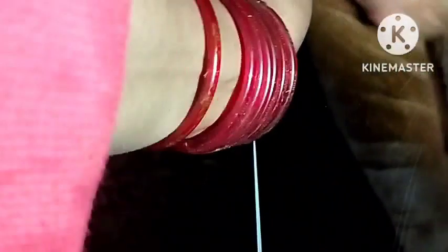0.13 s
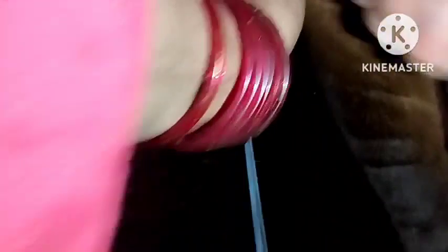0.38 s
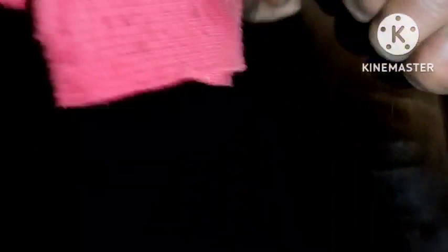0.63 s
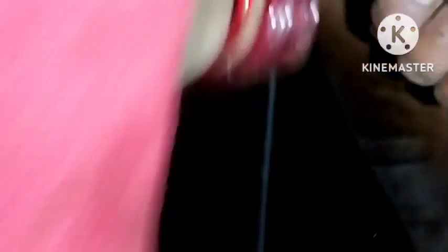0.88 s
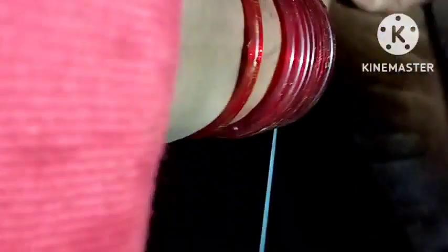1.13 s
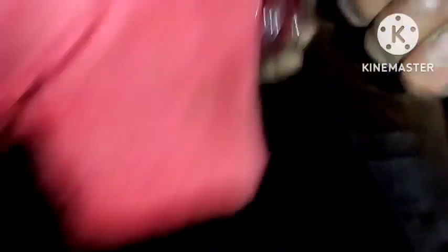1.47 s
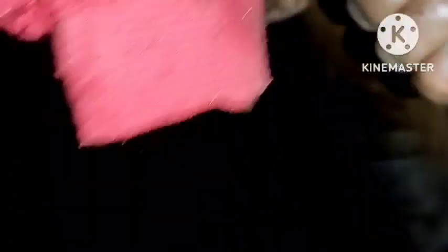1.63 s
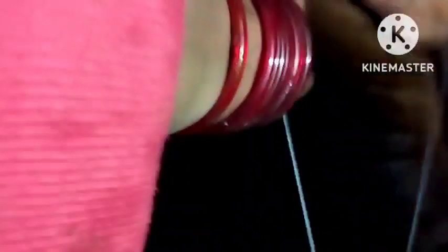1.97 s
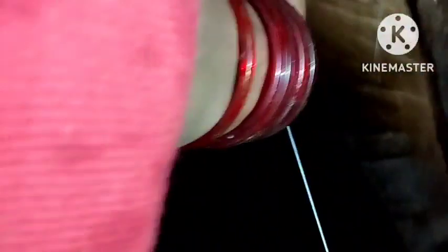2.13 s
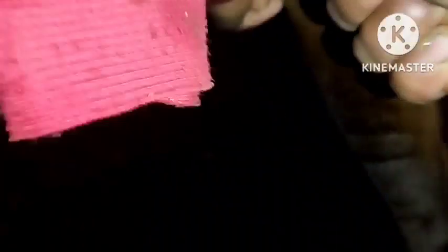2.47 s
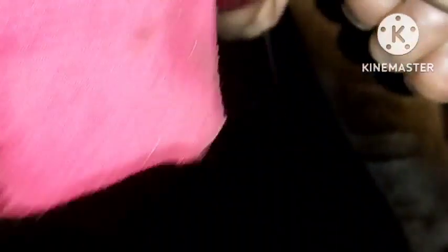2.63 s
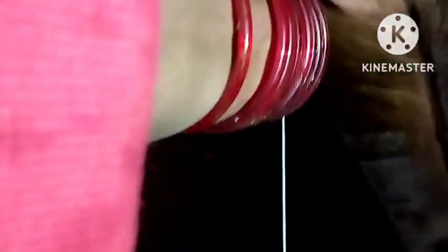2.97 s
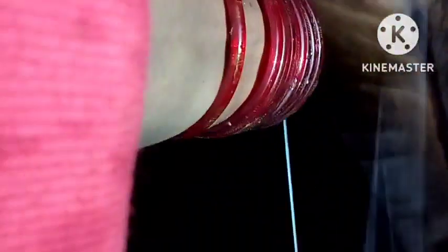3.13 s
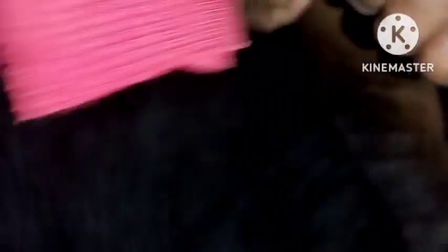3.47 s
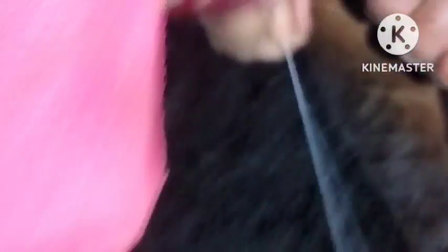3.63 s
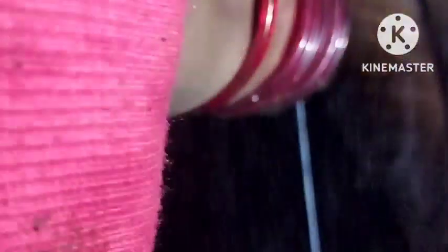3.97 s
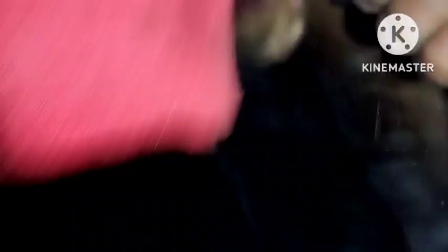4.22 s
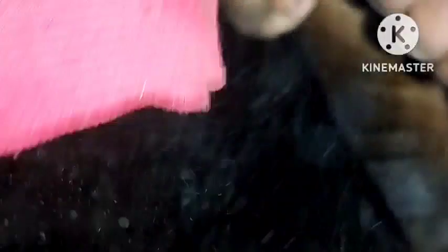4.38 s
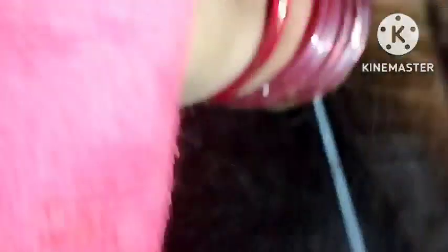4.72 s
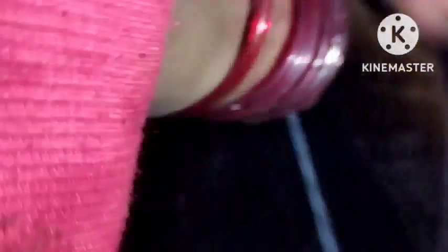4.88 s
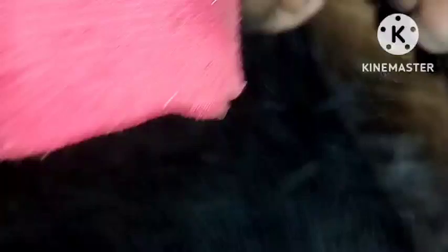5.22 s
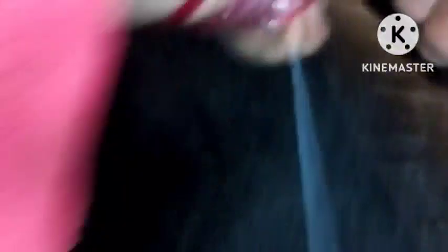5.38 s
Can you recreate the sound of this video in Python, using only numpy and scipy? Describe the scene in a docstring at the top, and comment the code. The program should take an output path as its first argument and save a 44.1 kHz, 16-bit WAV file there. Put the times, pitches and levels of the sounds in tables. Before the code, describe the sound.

Rhythmic jets of milk squirt into a frothy metal pail, each a hollow, gurgling splash with fizzing foam, close up in a quiet shed.

```python
"""Jets of milk from a hand-milked cow plunge into a frothy metal pail, close by, in a quiet shed.
Noisy bubble trains ring the air modes of the pail; decaying sines make the gulps of big air pockets.
Shaped noise makes froth, spray, slaps, hisses along the wall, low bumps on the right and still air.
Stray drops tick on the left, a bangle rings faintly at first, and late jets ring holes in the milk."""
import sys
import numpy as np
from scipy import signal
from scipy.fft import rfft, irfft, next_fast_len
from scipy.io import wavfile
from scipy.ndimage import uniform_filter1d, map_coordinates

SR = 44100
rng = np.random.default_rng(int(sys.argv[2]) if len(sys.argv) > 2 else 0)


def materialize(psi):
    """Save the field psi as 16-bit PCM at rate SR to the path in sys.argv[1].

    A 1-D psi becomes a single channel; in a 2-D psi each row is a channel.
    """
    bounded = np.clip(np.atleast_2d(psi).T, -1, 1)
    quanta = np.round(bounded * 32767).astype(np.int16)
    wavfile.write(sys.argv[1], SR, quanta)


N = 245637
TIME_S = np.arange(N) / SR
EDGE_HZ = 15700
ONSET_S, FADE_BEND = 0.0071, 1.16  # a jet fades slowly at first, then breaks off
SETTLING_DB = -57  # faint fizz of the foam between jets

# air modes of the pail: (frequency [Hz], width [Hz], relative level [dB], change per unit of aim [dB],
# left-right balance [dB], phase between the ears [rad])
DEEP_MODES = [(230, 38, -5, -1.5, -1.5, 0), (278, 36, -1, -2.5, -1, 0), (314, 24, 1, 2.5, -1, 0)]
DEPTH_MODES = [(608, 36, -10.5, -9.5, -5, 0.18), (691, 69, -11, 24, -2, 0),
               (763.4, 58, 2.5, -9.5, -1.5, 0.0091), (825, 150, -2, 4, -0.5, 0.32),
               (939, 61, 1.5, -8, -1, 0.52), (1049.6, 25, -8.5, -7, -16.5, 0.25)]
CROSS_MODES = [(1278, 140, 4, 6.5, 9.5, -2.5), (1402, 110, 3, -7, 0, -3),
               (1724.5, 155, -0.5, 22.5, -1, -1.5), (1885, 190, 10, 2, -2, -2.5),
               (2203, 126, -9, -7.5, 7, -0.5), (2748, 250, -3.5, 6.5, -25, -0.05)]
FIZZ_MODES = [(3080, 220, -1.1, 1, -2, 1), (3320, 320, 1, 0.66, -1, 1.3)]
# broad spectra: (frequency [Hz], relative density [dB per Hz])
CHURN_COLOUR = [(170, -18), (235, -1), (330, 0), (420, -10), (700, -40)]
PLUNGE_COLOUR = [(400, -73), (530, -16), (700, 2), (960, -0.5), (1150, 0), (1600, -51.5)]
SPLASH_COLOUR = [(750, -22), (1050, -4.5), (1400, 6.5), (1570, -2), (2000, 1.5), (2450, -4.5), (2850, -15),
                 (3500, -20.5), (5000, -59)]
FIZZ_COLOUR = [(2000, -25), (3000, -6.5), (3700, 1), (4500, -3.5), (5600, -5), (7000, -12.5), (8200, -27),
               (10000, -23)]
SPRAY_COLOUR = [(3000, -30), (5000, -11), (7000, -5.5), (8300, -14), (9500, -1), (11200, -4), (13000, 3.5),
                (15500, 0), (16500, -40)]
SHED_COLOUR = [(12, -33), (20, 1.5), (123, -13), (234, -35), (422, -11.5), (590, -23), (2600, -23),
               (13200, -50.5), (16000, -42)]
RUMBLE_COLOUR = [(20, 7.5), (50, -31), (120, 5.0), (200, 7.5), (400, -51)]
GRAZE_COLOUR = [(700, -13), (2000, 2), (3500, -4.5), (6200, 1.0), (8300, -11), (11000, -8.0)]
TICK_COLOUR = [(1000, -25), (4000, -14), (8200, -23), (9600, -8), (13000, 0), (15500, -2)]
BUMP_COLOUR = [(25, -29), (60, -3.5), (150, -2), (260, -11.5), (600, -40)]
# likeness of the ears: (frequency [Hz], correlation [-1 to 1])
EAR_LIKENESS = [(60, -0.11), (130, 0.94), (280, 0.94), (900, 0.78), (1200, 0.12), (3000, 0.05),
                (6000, -0.16)]
# where the jets land: (time [s], place [about -1 open milk, 1 close to the wall])
AIM = [(0, 0.27), (0.9, -1.42), (2.68, -0.21), (2.88, 0.72), (3.55, 0.19), (3.9, 0.42), (4.07, 0.76),
       (4.62, 0.37), (4.69, 0.99), (4.82, 0.984), (5.06, -0.35), (5.3, -0.53), (5.38, 0.61), (5.47, 0.6),
       (5.54, -0.26)]
# one jet or weak trickle of milk each: (start [s], flow [s], time to fade 20 dB [s], gurgle lasts on [s],
# swell over the flow [dB], then levels of churn, plunge, splash, fizz, spray [dB])
SQUIRTS = [(-0.25, 0.31, 0.14, 0, -0.5, -21.5, -20, -18, -23, -35.5),
           (0.13, 0.057, 0.4, 0.0, 0, -33, -32, -30.5, -36.5, -53),
           (0.228, 0.038, 0.44, 0.047, -3.5, -22.5, -33, -34, -42, -62),
           (0.676, 0.39, 0.21, 0.15, 11.5, -23.5, -23, -19, -23.5, -35.5),
           (1.26, 0.081, 0.02, 0.2, -6, -39.5, -33, -38, -59.5, -67),
           (1.614, 0.38, 0.24, 0.1, 4, -21, -20, -16.5, -23.5, -38.5),
           (2.185, 0.086, 0.22, 0.057, -1, -26, -24.5, -19.5, -23, -40),
           (2.531, 0.19, 0.12, 0.0, 0.5, -23.5, -22.5, -16.5, -20.5, -31.5),
           (2.743, 0.1, 0.3051, 0.23, 4, -27, -27, -20.5, -26.5, -41),
           (3.457, 0.34, 0.32, 0.15, 2, -26.5, -23, -21.5, -29.5, -41),
           (3.998, 0.23, 0.24, 0.19, -2, -26.5, -26, -21.5, -30.5, -43.5),
           (4.336, 0.34, 0.3, 0.18, 1, -22, -25.5, -19.5, -26, -41),
           (4.974, 0.12, 0.15, 0.14, 6, -29, -30, -22.5, -22.5, -33.5),
           (5.213, 0.24, 0.26, 0.069, -5, -22.5, -23.5, -14, -21.5, -39)]
# how a sound follows a jet: (starts below full level [dB], build-up [s], share of the swell [ratio],
# outlasts the flow [s], fade speed [ratio])
CHURN_FOLLOWS = (0.34, 0.03, 0.97, 0.0026, 1.43)
PLUNGE_FOLLOWS = (7.3, 0.067, 1.05, 0.011, 0.9)
SPLASH_FOLLOWS = (16.5, 0.045, 0.73, 0.001, 1.07)
FIZZ_FOLLOWS = (18.5, 0.063, 0.13, -0.02, 1.02)
SPRAY_FOLLOWS = (11, 0.055, 0.2, -0.03, 0.85)
# faint partials of a bangle on the wrist: (frequency [Hz], level before panning [dB], t60 [s])
BANGLE = [(3740, -42.5, 1.9), (12750, -45, 0.76)]
# a jet grazes the wall: (start [s], end [s], level before panning [dB], top of the hiss [Hz])
GRAZES = [(0.347, 0.624, -31.5, 3024), (3.185, 3.345, -32.5, 16200), (4.902, 5.014, -29.5, 16000)]
# a jet head or last spurt slaps milk or wall: (time [s], level before decay [dB], centre [Hz])
SLAPS = [(0.622, -30.5, 1120), (0.681, -20, 980), (1.43, -38.5, 1860), (1.619, -29, 900),
         (2.105, -22.5, 950), (2.501, -29.5, 2920), (2.533, -27, 1150), (3.355, -31, 1670),
         (3.45, -34, 1000), (4.055, -19.5, 1860), (4.918, -23.5, 3860)]
# single large air pockets: (time [s], envelope peak before the low cut [dB], pitch [Hz])
GULPS = [(0.672, -18, 305), (1.101, -6, 276), (1.616, -17, 241.5), (2.477, -18, 293), (2.527, -19, 320),
         (3.073, -14, 306), (4.311, -12.5, 297), (4.784, -11, 310), (4.825, -11.5, 296), (4.862, -15, 280),
         (5.2, -15, 264), (5.214, -6.5, 272)]
# stray drops: (time [s], peak before panning [dB])
TICKS = [(0.6983, -23), (0.97, -16), (2.4556, -14.5), (2.525, -22), (2.72, -6), (2.7378, -16),
         (3.0085, -23), (3.052, -23), (4.759, -18.5), (4.8569, -19.5), (4.998, -12.5), (5.382, -5.5)]
# soft low bumps: (time [s], level before panning [dB])
BUMPS = [(0.83, -30), (0.962, -32), (1.024, -37)]
# holes dug by hard jets: (start [s], length [s], level before the arch [dB], first pitch [Hz], last pitch [Hz])
HOLES = [(4.65, 0.1, -21, 1450, 1250), (4.75, 0.073, -26.5, 1330, 1300), (5.293, 0.177, -15.5, 1374, 1280),
         (5.471, 0.077, -21, 1460, 1130)]


def amp(db):
    """Decibels to gain."""
    return 10 ** (np.asarray(db) / 20)


def evened(x):
    """Scales to rms 1."""
    return x / np.sqrt(np.mean(x ** 2) + 1e-20)


def read(points, hz):
    """Reads a spectrum on a log-frequency axis."""
    f, value = np.transpose(points)
    return np.interp(np.log(hz + 1), np.log(f + 1), value)


def landing_place():
    """Path of the jets between open milk and wall."""
    return np.interp(TIME_S, *np.transpose(AIM))


def add(mix, start_s, sound):
    """Lays a sound into the stereo mix."""
    part = mix[:, max(round(start_s * SR), 0):][:, :sound.shape[-1]]
    part += sound[..., :part.shape[1]]


def pan(balance_db):
    """Left and right gains; positive is left."""
    return amp([[balance_db / 2], [-balance_db / 2]])


def noise(count):
    """Two unrelated white noises."""
    return rng.standard_normal((2, count))


def coloured(pair, colour):
    """Colours two unrelated signals; low sound leaves the pail as one wave, high sound differs by ear."""
    size = next_fast_len(pair.shape[1] + 2048)
    hz = np.fft.rfftfreq(size, 1 / SR)
    left, other = rfft(pair, size)
    same = np.clip(read(EAR_LIKENESS, hz), -1, 1)
    right = same * left + np.sqrt(1 - same ** 2) * other
    spectrum = np.array([left, right]) * amp(read(colour, hz))
    return evened(irfft(spectrum, size)[:, :pair.shape[1]])


def wander(rate_hz, count=400):
    """Random path of about unit size through rate_hz new values a second."""
    return np.interp(TIME_S * rate_hz, np.arange(count), rng.standard_normal(count))


def bubbles(per_s, spread_db, wash):
    """Two trains of bursting bubbles of uneven size over a wash of tiny ones."""
    size = amp(spread_db * np.minimum(rng.exponential(1, (2, N)), 4))
    bursts = rng.random((2, N)) < per_s / SR
    pops = size * rng.choice([-1, 1], (2, N)) * bursts
    return evened(evened(pops) + wash * noise(N))


def pail(drive, modes, drift_db, drift_hz):
    """Rings the air modes; where the jet lands shares the energy out among them."""
    out, power = np.zeros((2, N)), np.zeros(N)
    aim = landing_place()
    for hz, width_hz, db, aim_db, balance_db, phase_rad in modes:
        # a double pole is narrower than a single one, hence 1.55
        pole = np.exp((2j * hz - 1.55 * width_hz) * np.pi / SR)
        delayed = np.roll(drive, rng.integers(0, 200))
        ring = signal.lfilter([1], np.poly([pole, pole]), delayed)
        ears = (ring * np.exp([[0], [-1j * phase_rad]])).real
        gain = amp(db + aim_db * aim + drift_db * wander(drift_hz))
        out += gain * pan(balance_db) * evened(ears)
        power += gain ** 2
    return evened(out / np.sqrt(power))


def echoes(pair, shared, patch_hz, patch_s):
    """Wall reflections give each ear its own peaks and notches, which shift as the jet and hands move."""
    hz, t, spectrum = signal.stft(pair + shared * pair[::-1], SR, nperseg=1024)
    grid = np.meshgrid(hz / patch_hz, t / patch_s, indexing="ij")
    fields = rng.standard_normal((4, 400, 100))
    paths = np.array([map_coordinates(field, grid, order=2, mode="mirror") for field in fields])
    response = paths[:2] + 1j * paths[2:]
    return evened(signal.istft(spectrum * response, SR, nperseg=1024)[1][:, :N])


def plinks(per_s, decay_cycles, rise, count=24):
    """Single bubbles of many sizes ring briefly and rise in pitch as they near the surface."""
    out = np.zeros((2, N))
    for hz in np.geomspace(800, 3400, count):
        age = np.arange(0, 5, hz / decay_cycles / SR)  # in decay times
        plink = np.exp(-age) * np.sin(2 * np.pi * decay_cycles * (age + rise * age ** 2))
        births = rng.exponential(1, N) * (rng.random(N) < per_s / count / SR)
        out += rng.standard_normal((2, 1)) * signal.oaconvolve(births, plink)[:N]
    return evened(out)


def bounce(pair, delay_s, sway, strength, with_aim):
    """A reflection, strong near the wall, combs the sound; its path sways with the jet and gurgles."""
    share = np.clip(strength + with_aim * landing_place(), 0, .85)
    late_s = TIME_S - delay_s * (1 + sway * uniform_filter1d(wander(13), size=2000))
    echo = np.array([np.interp(late_s, TIME_S, ear) for ear in pair])
    return (pair - share * echo) / np.sqrt(1 + share ** 2)


def low_cut(pair, edge_hz):
    """Steep low cut on the deep sounds."""
    high_pass = signal.butter(N=7, Wn=edge_hz, btype="high", fs=SR, output="sos")
    return signal.sosfilt(high_pass, pair)


def squirts(column, follows, lingers=False):
    """Strength of one sound of the jets: it builds up, swells while the milk flows, then fades."""
    below_db, build_s, swell_share, outlast_s, fade_speed = follows
    power = np.zeros(N)
    for start_s, flow_s, fade_s, gurgle_s, swell_db, *levels_db in SQUIRTS:
        age_s = np.maximum(TIME_S - start_s, 0)
        held_s = max(flow_s + outlast_s + lingers * gurgle_s, ONSET_S)
        build_db = -below_db * np.exp(-age_s / build_s)
        hold_db = swell_share * swell_db * (np.minimum(age_s / held_s, 1) - .5)
        fade_db = -20 * (fade_speed * np.maximum(age_s - held_s, 0) / fade_s) ** FADE_BEND
        level_db = np.maximum(levels_db[column] + build_db + hold_db + fade_db, -120)
        power += (np.minimum(age_s / ONSET_S, 1) * amp(level_db)) ** 2
    return np.sqrt(power)


def churn():
    """Air pockets throb in the deepest modes of the pail."""
    drive = bubbles(per_s=500, spread_db=2, wash=0.54)
    boom = pail(drive[0], DEEP_MODES, drift_db=2, drift_hz=7)
    boom = boom + amp(-8) * coloured(drive, CHURN_COLOUR)
    loudness = np.sqrt(abs(uniform_filter1d(boom[0] ** 2, size=2600)) + 1e-6)
    steadied = evened(boom / loudness ** 0.51)  # partly evens out the loudness of the boom
    return squirts(0, CHURN_FOLLOWS, lingers=True) * steadied


def plunge():
    """The jet drums into the milk and rings the depth of the pail."""
    drive = bubbles(per_s=900, spread_db=1.5, wash=0.53)
    cloud = amp(-6.5) * coloured(drive[::-1], PLUNGE_COLOUR)
    modes = pail(drive[0], DEPTH_MODES, drift_db=2.0, drift_hz=8.4)
    return squirts(1, PLUNGE_FOLLOWS) * evened(modes + cloud)


def splash():
    """Small surface bubbles ring the modes across the pail, many near opposite in sign at its two sides."""
    drive = bubbles(per_s=1200, spread_db=1.0, wash=0.65)
    modes = pail(drive[0], CROSS_MODES, drift_db=3.5, drift_hz=11)
    cloud = echoes(coloured(drive, SPLASH_COLOUR), shared=0.47, patch_hz=101.67, patch_s=.1)
    single = plinks(per_s=250, decay_cycles=12, rise=0.01)
    body = modes + amp(-0.5) * pan(-4) * cloud + amp(-8.5) * single
    combed = bounce(body, delay_s=0.0012182, sway=0.061, strength=0.054, with_aim=0.55)
    return squirts(2, SPLASH_FOLLOWS) * evened(combed)


def froth():
    """The foam fizzes under the jet as many small bubbles burst."""
    drive = bubbles(per_s=1800, spread_db=2.0, wash=0.4)
    fizz = echoes(coloured(drive, FIZZ_COLOUR), shared=0.77, patch_hz=140.1, patch_s=.09)
    modes = pail(drive[0], FIZZ_MODES, drift_db=5, drift_hz=6.4)
    return pan(2.5) * squirts(3, FIZZ_FOLLOWS) * evened(fizz + amp(-6) * modes)


def spray():
    """The finest spray, mostly on the left, flickers and goes on faintly as the foam settles."""
    mist = coloured(bubbles(per_s=2900, spread_db=2.0, wash=1.0), SPRAY_COLOUR)
    strength = squirts(4, SPRAY_FOLLOWS) + amp(SETTLING_DB)
    return amp(0.72 * wander(18)) * strength * evened(pan(14) * mist)


def bangle():
    """A thin, glassy ring of decaying sines dies away during the first strokes."""
    ring = np.zeros(N)
    for hz, db, t60_s in BANGLE:
        fade_db = -60 * np.minimum(TIME_S / t60_s, 2)
        ring += amp(db + fade_db) * np.sin(2 * np.pi * hz * TIME_S)
    return pan(7.2) * ring


def shed():
    """Still air of the shed, with a faint, uneven rumble."""
    air = coloured(noise(N), SHED_COLOUR)
    rumble = coloured(noise(N), RUMBLE_COLOUR)
    rumble_db = -45.5 + np.clip(3 * wander(2.32), -6, 6)
    return amp(-39) * air + amp(rumble_db) * pan(-9.5) * rumble


def grazes():
    """A jet hisses along the metal wall, swelling and then breaking off; a dulled one only swishes."""
    out = np.zeros((2, N))
    hiss = coloured(bubbles(per_s=1500, spread_db=1.0, wash=0.84), GRAZE_COLOUR)
    for start_s, end_s, db, top_hz in GRAZES:
        through = np.clip((TIME_S - start_s) / (end_s - start_s), 0, 1)
        arch = np.sqrt(4 * through * (1 - through))
        dulled = signal.sosfilt(signal.butter(N=4, Wn=top_hz, fs=SR, output="sos"), hiss)
        out += amp(db) * arch * evened(dulled)
    return pan(4) * out


def slaps():
    """The head of a jet or a last spurt lands with a short, wet smack of decaying noise."""
    out, t = np.zeros((2, N)), np.arange(6000) / SR
    for start_s, db, hz in SLAPS:
        colour = [(hz / 3, -18), (hz / 1.16, 0), (hz * 1.23, 0), (hz * 5, -32)]
        smack = coloured(noise(len(t)), colour)
        add(out, start_s, amp(db) * smack * np.exp(-t / 0.017))
    return out


def gulps():
    """A large air pocket swells and rings for a few cycles."""
    out, t = np.zeros((2, N)), np.arange(6000) / SR
    age = t / 0.0058  # envelope peaks at 1
    for start_s, db, hz in GULPS:
        add(out, start_s, amp(db) * age * np.exp(1 - age) * np.sin(2 * np.pi * hz * t))
    return out


def ticks():
    """Stray drops make short, bright ticks: noise with a fast and a weaker slow decay."""
    out, t = np.zeros((2, N)), np.arange(2000) / SR
    fade = np.exp(-t / .0011) + .15 * np.exp(-t / .009)
    for start_s, db in TICKS:
        tick = coloured(fade * noise(len(t)), TICK_COLOUR)
        add(out, start_s, amp(db) * pan(17.5) * tick / abs(tick).max())
    return out


def bumps():
    """Dull, brief pushes of low noise on the right."""
    out, t = np.zeros((2, N)), np.arange(4000) / SR
    age = t / 0.0059
    for start_s, db in BUMPS:
        push = coloured(noise(len(t)), BUMP_COLOUR)
        add(out, start_s, amp(db) * pan(-33) * push * age * np.exp(1 - age))
    return out


def holes(overtone, overtone_db, ear_phase_rad):
    """Bubbles ring the air in the hole under a hard jet, falling in pitch; it swells and closes in one arch."""
    out, smooth = np.zeros((2, N)), signal.butter(N=2, Wn=55, fs=SR, output="sos")
    drive = bubbles(per_s=1200, spread_db=3, wash=.4)[0]
    for start_s, length_s, db, first_hz, last_hz in HOLES:
        through = np.linspace(0, 1, round(length_s * SR))
        turns = np.cumsum(first_hz + (last_hz - first_hz) * through) / SR
        pops = np.resize(drive[round(start_s * SR):][:len(turns)], len(turns))
        rings = []
        for ratio in (1, overtone):
            # shift down, low-pass, shift back: a resonance that follows the pitch
            carrier = np.exp(2j * np.pi * ratio * turns)
            rings.append(signal.sosfilt(smooth, pops * carrier.conj()) * carrier)
        ring = rings[0] + amp(overtone_db) * rings[1]
        ears = (ring * np.exp([[0], [1j * ear_phase_rad]])).real
        add(out, start_s, amp(db) * np.sin(np.pi * through) * evened(ears))
    return out


def scene():
    """Everything heard at the rim of the pail."""
    deep = low_cut(churn() + gulps(), edge_hz=195)
    jets = deep + plunge() + splash() + froth() + spray()
    milk = jets + slaps() + holes(overtone=1.8, overtone_db=-11, ear_phase_rad=2.05)
    return milk + bangle() + shed() + grazes() + ticks() + bumps()


def record(dry):
    """Full-scale limit, then the band limit."""
    low_pass = signal.firwin(511, EDGE_HZ, window=("kaiser", 9), fs=SR)
    return signal.oaconvolve(np.clip(dry, -1, 1), low_pass[None], "same")


dry = scene()
out = record(dry)
materialize(out)
```